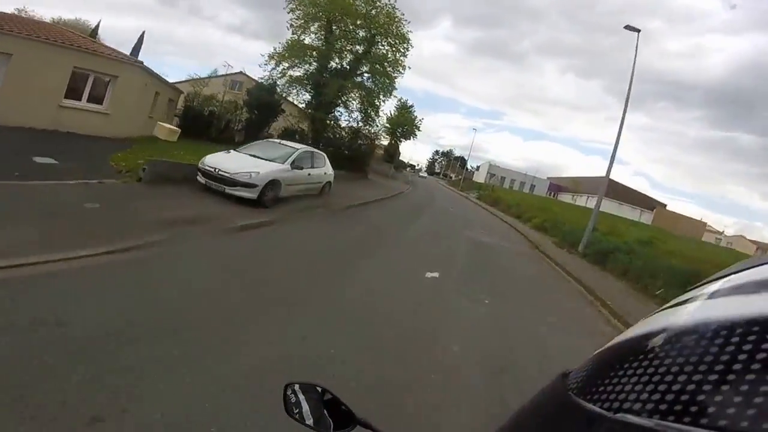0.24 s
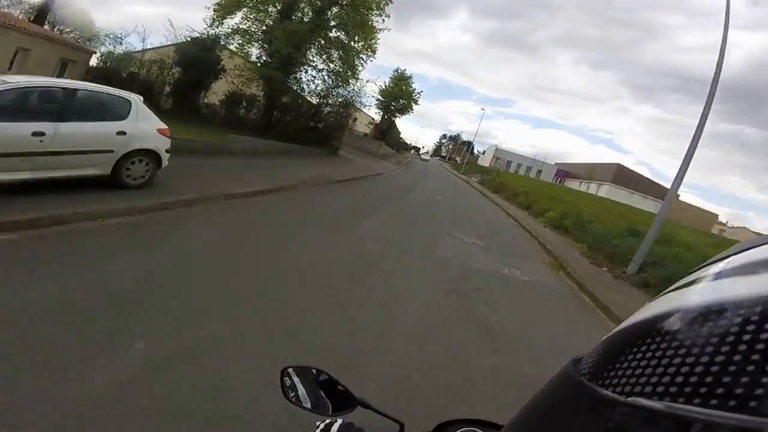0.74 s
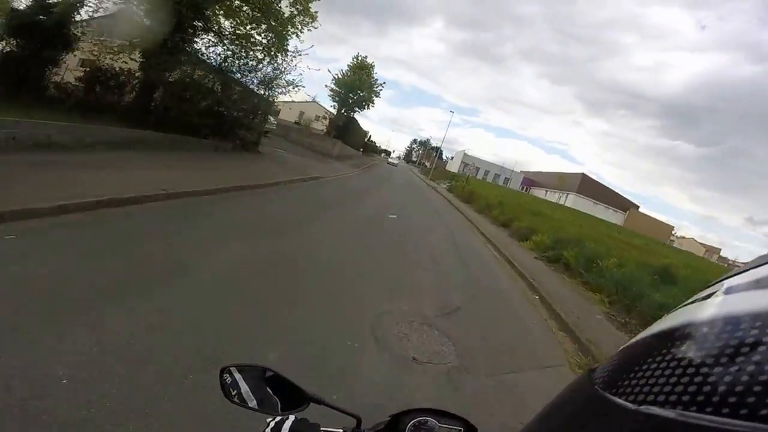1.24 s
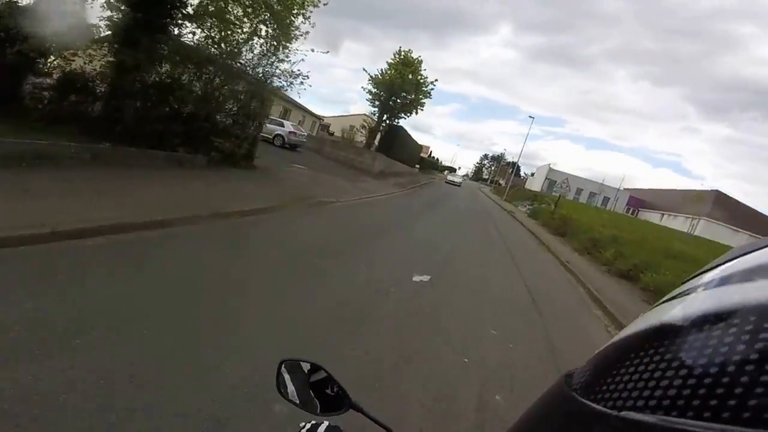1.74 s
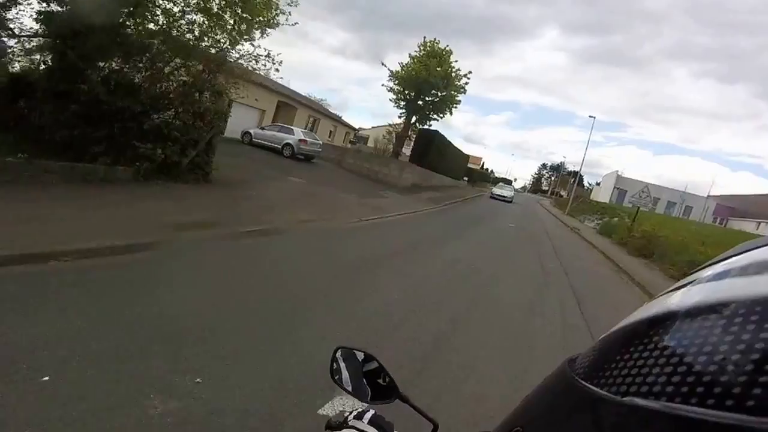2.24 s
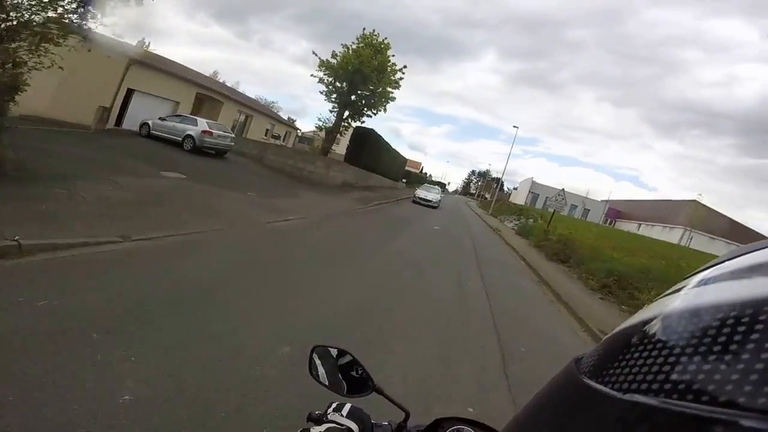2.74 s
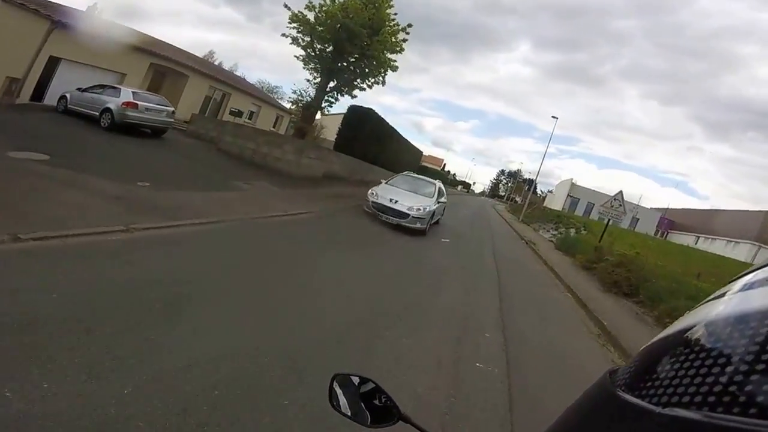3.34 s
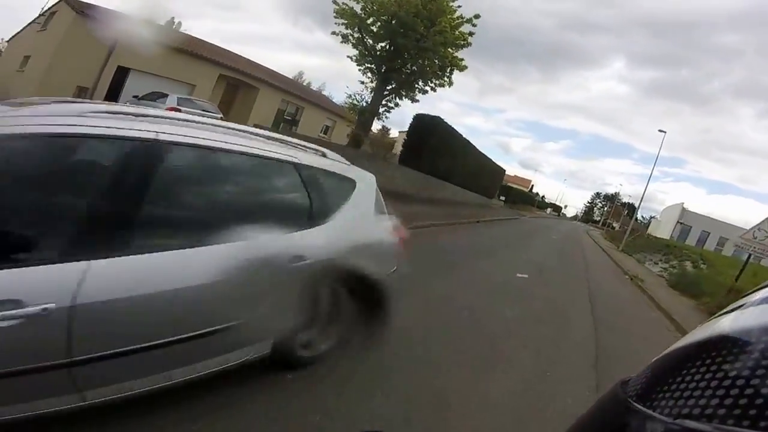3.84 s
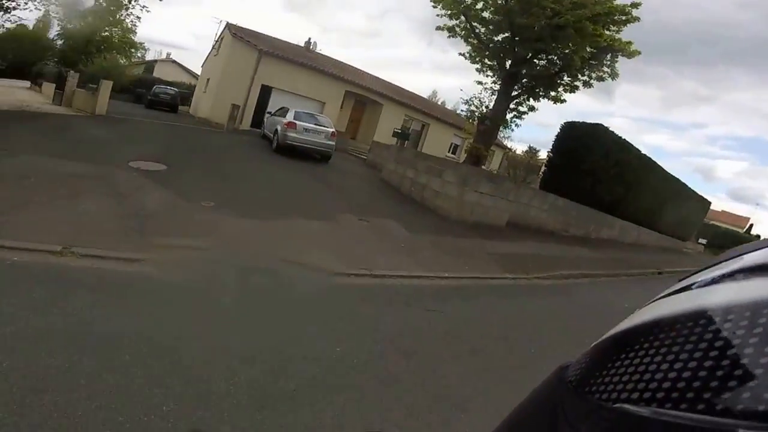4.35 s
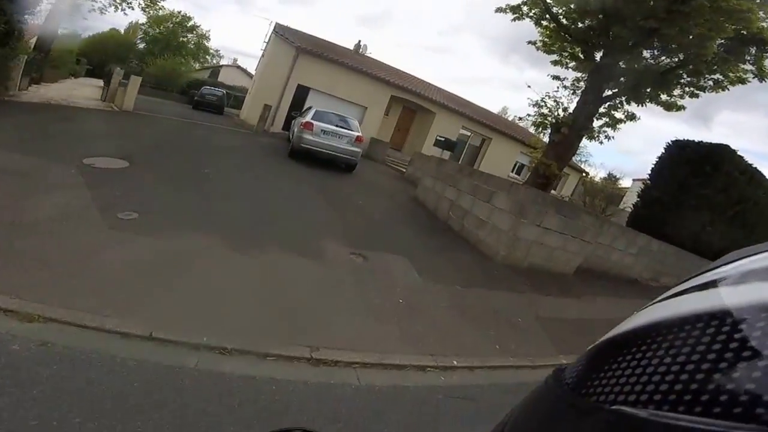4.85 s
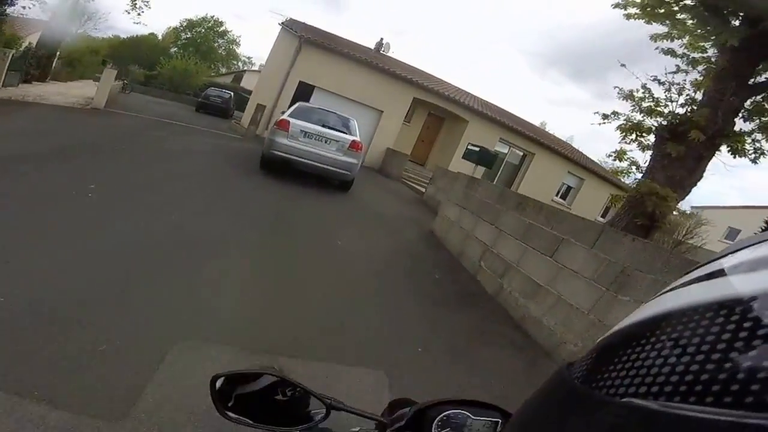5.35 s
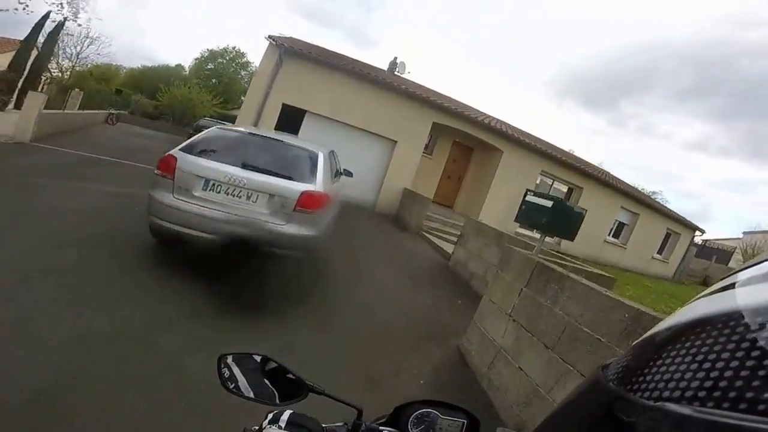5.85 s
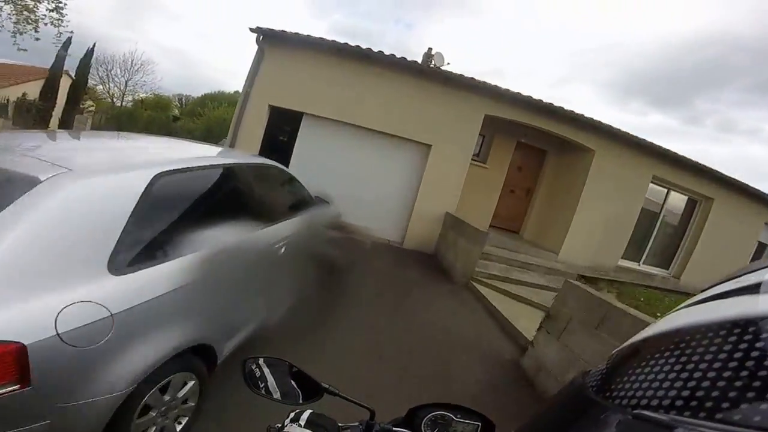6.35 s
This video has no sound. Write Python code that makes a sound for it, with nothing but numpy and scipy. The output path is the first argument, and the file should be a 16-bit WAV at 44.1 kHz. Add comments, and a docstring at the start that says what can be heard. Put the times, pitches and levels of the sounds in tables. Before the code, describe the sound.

A motorcycle slows, shifts down and revs briefly in buffeting wind; a car swishes past, then the bike pulls twice and idles.

```python
"""From the rider's helmet, a two-cylinder motorcycle is heard slowing down with the throttle shut, then
clunking down a gear. At 3 s it gets a quick rev and idles as an oncoming car nears, passing at 4 s.
It then pulls twice to turn into a driveway and drops back to idle at 6 s. All along, the firings thump
and ring the airbox (the air filter's box), valves and gears clatter, and wind buffets the microphone."""
import sys
import numpy as np
from scipy import signal
from scipy.fft import rfft, irfft, next_fast_len
from scipy.io import wavfile
from scipy.ndimage import uniform_filter1d, map_coordinates

SR = 44100
rng = np.random.default_rng(int(sys.argv[2]) if len(sys.argv) > 2 else 0)


def output_pcm(signal):
    """Save a mono or channel-first signal as 16-bit PCM at the path in sys.argv[1].

    Samples are clipped to [-1, 1] before scaling.
    """
    pcm = np.clip(np.atleast_2d(signal).T, -1, 1) * 32767
    wavfile.write(sys.argv[1], SR, np.round(pcm).astype(np.int16))


N = 290607

# the notes at which the engine's metal casing rings: (pitch [Hz], width [Hz], gain [dB])
CASING_NOTES = [(967, 98, -12.5), (1484, 87, 7), (1618, 107, 2.5), (2214, 184, -3.5)]


def exhaust_and_intake(crank, firing_hz, throttle, turbulence=.07, burp_half_s=.028, burbles_per_s=10.6):
    """Firings thump out of the silencer and ring the airbox; an open throttle lets out higher notes."""
    # the engine's voice with the throttle shut: (firing rate [Hz], exhaust thump [dB],
    # airbox boom [dB], intake bark [dB], roughness [0-1], burble of uneven burning [dB])
    shut_voice = [(44.31, -47, -45.5, -55, 0.15, 1.6), (74.42, -45, -44.5, -53, 0.39, 3.5),
                  (102.4, -37, -42.5, -47, 0.29, 2.5), (108, -34, -38, -46.5, 0.12, 2.4),
                  (133, -36, -33, -45.5, 0.17, -0.4), (153, -43, -33.6, -49.5, 0.05, 1.5),
                  (158, -35.5, -39.5, -38.5, .07, 2.5), (168.4, -37, -35.5, -31, 0.02, 2)]
    # the same columns with the throttle wide open
    open_voice = [(59, -36.5, -34.5, -31, .24, 1.18), (87.6, -34.5, -36.5, -32.5, 0.048, 2.9),
                  (109.05, -38, -31.5, -25.5, 0.02, 0.84), (123, -39, -34, -25, 0.064, 0.82)]
    # burps of late-burning fuel: (time [s], lift of the boom [dB])
    burps = [(1.58, 6), (1.65, 4), (2.41, 0), (5.9, 7), (6.02, 7.5), (6.16, 3.5), (6.38, 5.5)]
    # ringing notes of the airbox and of the air intake: (pitch [Hz], width [Hz], gain [dB])
    airbox_notes = [(90, 62, 1), (219.5, 33.4, 7.5), (260, 9.7, 9), (343.2, 63, 5)]
    intake_notes = [(385, 70, -6), (465, 90, -18), (570, 80, -17)]
    blend = (1 - throttle) * at_speed(shut_voice, firing_hz) + throttle * at_speed(open_voice, firing_hz)
    thump_db, boom_db, bark_db, rough, burble_db = blend
    burp_db = sum(db * swell(s, burp_half_s) for s, db in burps)
    swirls = turbulence * noise() * np.sqrt(firing_hz / SR) * (1 + np.cos(2 * np.pi * crank))
    gas = firings(crank, rough) + swirls
    airbox = cut(resonate(gas, airbox_notes), 380, "low", order=6)
    intake = cut(resonate(gas, intake_notes), 620, "low", order=10)
    voice = airbox + throttle * intake
    parts = [(band(voice, 64, 175), thump_db),
             (band(voice, 175, 300), boom_db + burp_db),
             (band(voice, 300, 750), bark_db + burp_db / 2)]
    return sum(from_db(db + burble_db * wander(burbles_per_s)) * steady(part) for part, db in parts)


def firings(crank, rough, scatter_db=7.0, imbalance_db=4, jitter_s=.0016):
    """The cylinders take turns, one pulse per crank turn; rough burning upsets strength and timing."""
    at = ticks(crank)
    strength_luck, timing_luck = np.clip(rng.standard_normal((len(at), 2)), -2, 2).T
    cylinder = (-1) ** np.arange(len(at))
    strength = from_db(rough[at] * (scatter_db * strength_luck + imbalance_db * cylinder))
    late = (jitter_s * SR * rough[at] * timing_luck).astype(int)
    return np.bincount(np.clip(at + late, 0, N - 1), strength, N)


def engine_speed(idle_hz=43.85, idle_wobble=.05, wobbles_per_s=6):
    """Firings per second; the slower the engine turns, the more its speed wobbles."""
    # how fast the engine runs: (time [s], firing rate [Hz])
    speed = [(0.0, 174), (0.2, 158.4), (0.6, 138.3), (1.2, 110.4), (1.4, 100.3), (1.6, 93.4), (2.0, 83.4),
             (2.38, 65), (2.63, 43.2), (2.98, 44.5), (3.04, 80.6), (3.12, 72), (3.2, 58.4), (3.4, 44.6),
             (3.82, 48), (3.98, 53.4), (4.05, 64), (4.16, 76), (4.38, 103.4), (4.46, 116.7), (4.55, 118),
             (4.75, 68.6), (4.83, 60.3), (5.1, 99), (5.2, 110.7), (5.3, 114), (5.6, 105.3), (5.7, 98.7),
             (5.85, 75), (5.93, 70), (6.1, 47), (6.59, 46.6)]
    firing_hz, = in_time(speed)
    return firing_hz * (1 + idle_wobble * (idle_hz / firing_hz) ** 4 * wander(wobbles_per_s))


def machinery(crank, firing_hz, throttle, throb=.092, full_throttle_db=3, uneven_db=1.4):
    """Tapping and rubbing parts throb with the crank and sound through the casing, louder at speed."""
    # loudness of the moving parts: (firing rate [Hz], casing clatter [dB],
    # gear and chain rush [dB], gear whine [dB], gearbox hum [dB])
    part_levels = [(44.46, -53, -57.5, -79.5, -78.5), (75, -50, -55.5, -74.5, -60),
                   (94.8, -49, -53, -59, -56), (118.35, -48, -48.5, -51.5, -55),
                   (138.7, -43, -43.5, -57, -54.5), (161.4, -42.5, -38, -59, -56),
                   (177, -43.5, -34, -42, -67)]
    # loudness of the hiss: (time [s], level [dB])
    hiss_levels = [(0, -49), (.45, -58), (1.05, -57), (2.65, -71.5), (3.1, -66.5), (3.45, -73), (4.25, -71),
                   (4.5, -62), (4.8, -69), (5.45, -55), (6.1, -68), (6.59, -63.5)]
    # tone of the rush and of the hiss: (pitch [Hz], level [dB])
    rush_tone = [(600, -3), (900, -13), (1250, -1.5), (1900, -0.5), (2400, 0), (2900, 1.5), (3200, -1),
                 (3550, 0.5), (3900, -10), (4400, -21.5), (6000, -83)]
    hiss_tone = [(3500, -14), (4400, -10.5), (5050, 4.5), (5600, -5.5), (6100, 7), (6450, 1.5),
                 (6900, -13.5), (8100, -4), (9200, -12.5), (10200, -15), (12000, -25), (15000, -34)]
    # lowest notes of the gearbox, shaken by the chain: (pitch [Hz], width [Hz], gain [dB])
    hum_notes = [(534, 36, 1), (898, 25, -11)]
    clatter_db, rush_db, whine_db, hum_db = at_speed(part_levels, firing_hz)
    clatter_db = clatter_db + full_throttle_db * throttle + uneven_db * wander(per_s=12)
    hiss_db, = in_time(hiss_levels)
    taps = valve_taps(crank)
    rubbing = 1 + throb * np.cos(2 * np.pi * crank)
    casing = resonate(.43 * taps + rubbing * noise(), CASING_NOTES)
    clatter = steady(cut(cut(casing, 610, "high"), 2160, "low", order=4))
    rush = coloured(.22 * taps + rubbing * noise(), rush_tone)
    hiss = coloured(.24 * taps + rubbing * noise(), hiss_tone)
    hum = rms_one(resonate(noise(), hum_notes))
    return (from_db(clatter_db) * clatter + from_db(rush_db) * rush + from_db(hiss_db) * hiss
            + from_db(whine_db) * gear_whine(crank) + from_db(hum_db) * hum)


def valve_taps(crank, scatter_db=4.0, count=8):
    """Valves and chain strike at set points in every two crank turns, with ever-changing force."""
    taps = np.zeros(N)
    for angle in (np.arange(count) + rng.random(count)) / count:
        at = ticks(crank / 2 + angle)
        taps[at] += rng.choice([-1, 1]) * from_db(scatter_db * rng.standard_normal(len(at)))
    return steady(taps)


def gear_whine(crank, flutter_hz=30):
    """Gear teeth meet and whine unevenly through the casing."""
    # two pairs of gears: (teeth meeting per firing [count], level [dB])
    gear_pairs = [(7.5, -1), (15, 0)]
    whine = sum(from_db(db) * np.sin(2 * np.pi * teeth * crank) for teeth, db in gear_pairs)
    return steady(resonate(whine, CASING_NOTES)) * rms_one(1 + wander(flutter_hz))


def knocks(crack_db=-9, crack_s=.0035, rattle_db=-23, rattle_s=.018, casing_db=28):
    """Steel meets steel: a short crack, a rattle of loose parts and the ring of casing and gearbox."""
    # knocks of gear lever, gearbox and frame, with how hard each drives three sounds:
    # (time [s], crack [dB], casing ring [dB], gearbox ring [dB])
    hits = [(0.8757, -34, -24, -42), (1.3281, -42, -28.5, -44), (1.6755, -33, -30, -43),
            (1.6939, -29.5, -31, -41), (1.7437, -31, -26, -28), (1.775, -31, -30, -31),
            (1.8986, -33, -33, -44), (1.92, -17, -23.5, -16.5), (2.8626, -37, -29, -28.5),
            (4.0088, -30, -27, -31), (4.1838, -35.5, -24.5, -24.5), (5.0156, -34, -34, -34),
            (5.062, -35, -31, -39), (5.1941, -31, -35, -28), (5.3128, -31, -35, -34),
            (5.5213, -25.5, -24, -24)]
    # notes of the struck gearbox: (pitch [Hz], level [dB], time to fade by 60 dB [s])
    gearbox_notes = [(544, -22, .085), (910, -27, .08), (1250, -13, .014), (1560, -15, .02),
                     (2245, -22, .14), (2520, -18, .03), (2900, -14, .014), (3350, -14, .012)]
    # tone of the crack and rattle: (pitch [Hz], level [dB])
    crack_tone = [(250, -8), (550, 0), (800, -5), (1300, 1), (2200, -1), (3400, -4), (4300, -22),
                  (6200, -21), (8000, -31), (15000, -44)]
    blows = np.zeros((3, N))
    for s, *levels_db in hits:
        blows[:, int(s * SR)] = from_db(levels_db)
    on_crack, on_casing, on_gearbox = blows
    t = np.arange(SR // 4) / SR
    ring = sum(from_db(db - 60 * t / fade_s) * np.sin(2 * np.pi * hz * t) * (-1) ** k
               for k, (hz, db, fade_s) in enumerate(gearbox_notes))
    gearbox = signal.fftconvolve(on_gearbox, ring)[:N]
    casing = from_db(casing_db) * cut(resonate(on_casing, CASING_NOTES), 1900, "low")
    fade = from_db(crack_db) * np.exp(-t / crack_s) + from_db(rattle_db) * np.exp(-t / rattle_s)
    cracks = coloured(noise(), crack_tone) * signal.fftconvolve(on_crack, fade)[:N]
    return cut(gearbox + casing, 4900, "low", order=4) + cut(cracks, 8000, "low")


def wind():
    """Big swirls of air buffet the microphone and air over the helmet's rim drones; gusts swell both."""
    # the wind between gusts: (time [s], buffeting [dB], drone [dB])
    breeze = [(0, -34.5, -40.5), (1.2, -41, -39), (2.0, -41.5, -44), (2.3, -50, -45), (4.1, -49.5, -45.5),
              (5.1, -45, -52), (5.9, -46, -46), (6.59, -46, -43)]
    # gusts on top of it: (peak time [s], half length [s], buffeting [dB], drone [dB])
    gusts = [(.43, .12, -50, -30), (0.61, 0.024, -37, -28.5), (0.98, 0.037, -39, -35),
             (1.82, 0.031, -25, -26), (3.23, .06, -65, -37), (5.3, 0.041, -30, -38),
             (5.552, 0.053, -21, -33), (5.69, 0.073, -33.5, -34.5)]
    # tone of the buffeting and of the drone: (pitch [Hz], level [dB])
    buffet_tone = [(6, -16), (15, 12), (28, -19), (38, -9), (55, -24), (100, -30), (200, -37), (500, -58),
                   (1500, -79)]
    drone_tone = [(25, -16), (38, -8), (50, 2.5), (60, -13.5), (75, -38), (120, -29.5), (300, -27),
                  (1500, -83)]
    buffet_gain, drone_gain = from_db(in_time(breeze))
    for s, half_s, buffet_db, drone_db in gusts:
        gust = swell(s, half_s)
        buffet_gain = np.hypot(buffet_gain, from_db(buffet_db) * gust)
        drone_gain = np.hypot(drone_gain, from_db(drone_db) * gust)
    buffet = steady(coloured(noise(), buffet_tone), size=6000)
    drone = steady(coloured(noise(), drone_tone), size=6000)
    return buffet_gain * buffet + drone_gain * drone


def passing_car(nearest_db=-37.5, passes_s=3.97, swing_s=.3, falloff=1.89, doppler=.05, delay_s=.00297):
    """Tyres swish by, dropping in pitch; a faint, slightly delayed copy adds a sweeping colour."""
    # tone of the tyres: (pitch [Hz], level [dB])
    tyre_tone = [(110, -14), (190, 4.5), (450, -12), (750, -8), (1050, -6), (1400, 5.5), (1800, -2.5),
                 (2400, -14), (3500, -18), (4400, -33.5), (6200, -23.5), (7000, -35.5), (8500, -35),
                 (15000, -62)]
    along = (np.arange(N) / SR - passes_s) / swing_s
    distance = np.hypot(1, along)  # 1 when nearest
    heard_at = np.cumsum(1 - doppler * along / distance)  # waves bunch up coming, stretch out going
    swish = coloured(noise(), tyre_tone)
    passing = map_coordinates(swish, [heard_at], mode="mirror")
    delayed = map_coordinates(swish, [heard_at - delay_s * SR / distance], mode="mirror")
    return from_db(nearest_db) / distance ** falloff * rms_one(passing + .24 * delayed)


def road(level_db=-57.0):
    """The bike's own tyres roll along with a soft, even noise."""
    # tone of the rolling: (pitch [Hz], level [dB])
    road_tone = [(30, -16), (100, -22), (240, 1), (380, -5.5), (550, -7.5), (800, -13.5), (1500, -28.5),
                 (4000, -24), (9000, -32.5), (15000, -38)]
    return from_db(level_db) * coloured(noise(), road_tone)


def from_db(db):
    """Turn decibels into a number to multiply by."""
    return 10 ** (np.asarray(db) / 20)


def rms_one(x):
    """Scale a signal to an average power of one."""
    return x / np.sqrt(np.mean(x ** 2) + 1e-20)


def steady(x, size=3500):
    """Hold the power near one over stretches of `size` samples, keeping single pulses."""
    power = uniform_filter1d(uniform_filter1d(x ** 2, size), size)
    return x / np.sqrt(np.maximum(power, 1e-18))


def in_time(rows):
    """Join a table's timed points with straight lines, one curve per column."""
    s, *columns = np.transpose(rows)
    return [np.interp(np.arange(N) / SR, s, c) for c in columns]


def at_speed(rows, firing_hz):
    """Look up each column of a table at the engine speed of the moment."""
    hz, *columns = np.transpose(rows)
    return np.array([np.interp(firing_hz, hz, c) for c in columns])


def ticks(turns):
    """The samples at which a new turn starts."""
    return np.flatnonzero(np.diff(np.floor(turns)) > 0)


def swell(s, half_s):
    """A smooth rise and fall around a moment."""
    return np.exp(-((np.arange(N) / SR - s) / half_s) ** 2)


def noise():
    """White noise: an even hiss."""
    return rng.standard_normal(N)


def wander(per_s):
    """A slow random drift, typically of size one."""
    return rms_one(cut(rng.standard_normal(N + SR), per_s, "low")[SR:])


def coloured(x, tone):
    """Shape a signal's lows and highs by a tone table, then scale it to a power of one."""
    hz, db = np.transpose(tone)
    size = next_fast_len(N, real=True)
    bins_hz = np.maximum(np.fft.rfftfreq(size, 1 / SR), 1)
    gain = from_db(np.interp(np.log(bins_hz), np.log(hz), db))
    return rms_one(irfft(rfft(x, size) * gain, size)[:N])


def cut(x, hz, kind, order=2):
    """Keep what lies below ("low") or above ("high") a pitch."""
    return signal.sosfilt(signal.butter(order, hz, kind, fs=SR, output="sos"), x)


def band(x, low_hz, high_hz):
    """Keep what lies between two pitches, without delaying the pulses."""
    return signal.sosfiltfilt(signal.butter(3, [low_hz, high_hz], "band", fs=SR, output="sos"), x)


def resonate(x, notes):
    """Let a signal ring each note of a table; narrower notes ring longer."""
    out = np.zeros(N)
    for hz, width, db in notes:
        r = np.exp(-np.pi * width / SR)
        feedback = [1, -2 * r * np.cos(2 * np.pi * hz / SR), r * r]
        out += from_db(db) * (1 - r * r) / 2 * signal.lfilter([1, 0, -1], feedback, x + 1e-18)
    return out


def scene(voice_gain_db=-1.32):
    """Speed and throttle drive the engine; knocks, wind, road and the car join it."""
    # the rider's hand, one quick rev and two pulls: (time [s], throttle [0-1])
    hand = [(2.99, 0.03), (3.03, 0.99), (3.12, 0.52), (3.155, 0.07), (3.98, 0.04), (4.08, 0.7),
            (4.23, 0.97), (4.35, 0.81), (4.46, 0.98), (4.62, 0.55), (4.82, 0.2), (4.96, 0.75), (5.25, 0.87),
            (5.55, 0.64), (5.76, 0.43), (5.83, 0.01)]
    throttle = np.clip(in_time(hand)[0], 0, 1)
    firing_hz = engine_speed()
    crank = np.cumsum(firing_hz) / SR  # turns of the engine's shaft so far
    voice = from_db(voice_gain_db) * exhaust_and_intake(crank, firing_hz, throttle)
    engine = voice + machinery(crank, firing_hz, throttle)
    return (engine + knocks() + wind() + road() + passing_car())[None]


def record(dry, top_hz=15200):
    """Cut off the very highest treble steeply."""
    return signal.sosfilt(signal.ellip(10, .1, 90, top_hz, fs=SR, output="sos"), dry)


dry = scene()
out = record(dry)
output_pcm(out)
```